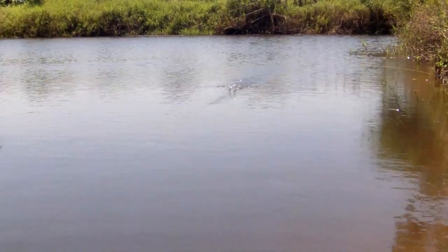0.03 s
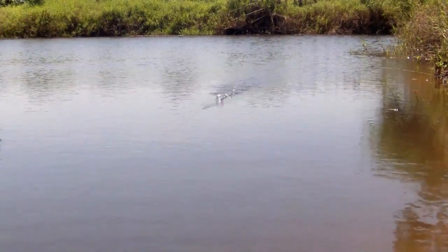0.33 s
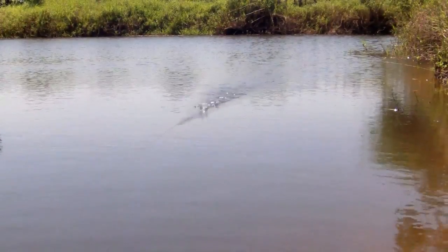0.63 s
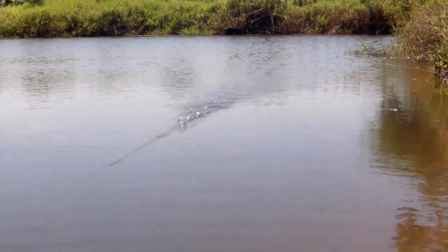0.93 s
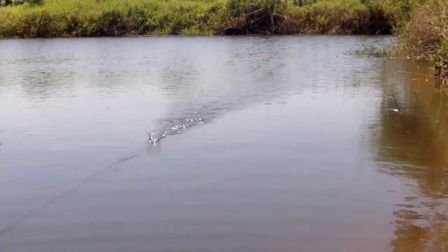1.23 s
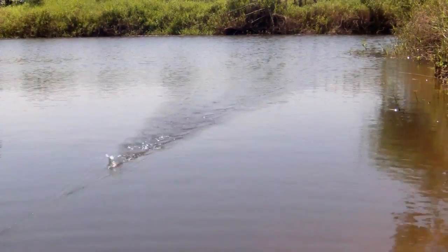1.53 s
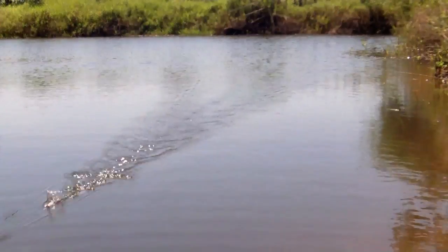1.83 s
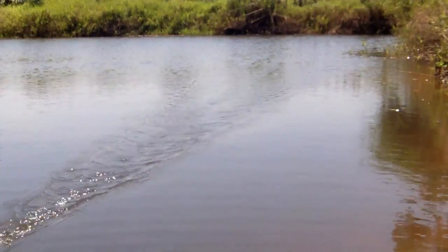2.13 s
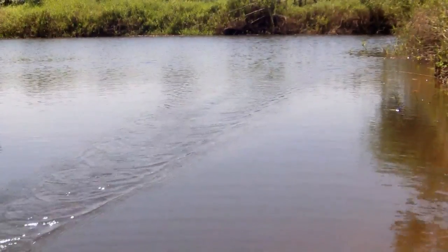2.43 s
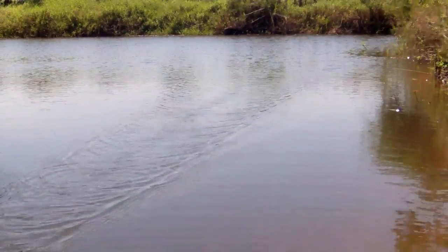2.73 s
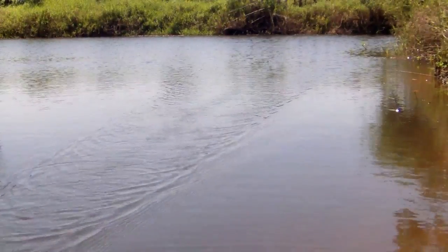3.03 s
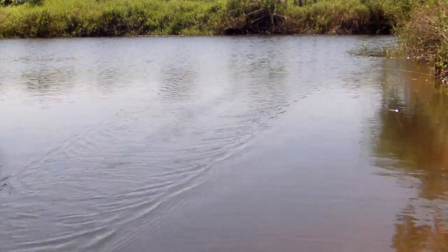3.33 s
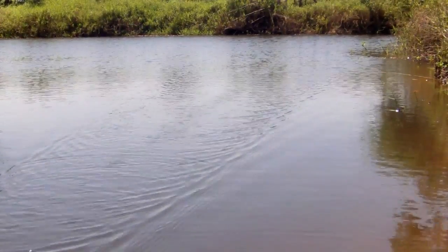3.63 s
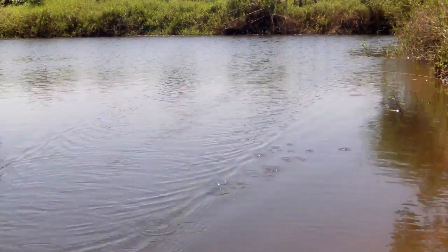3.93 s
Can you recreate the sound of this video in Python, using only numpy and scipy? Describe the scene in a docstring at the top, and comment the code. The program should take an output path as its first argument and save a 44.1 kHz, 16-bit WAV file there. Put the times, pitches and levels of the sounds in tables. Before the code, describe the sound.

Small splashes and gurgles build as a lure is reeled in over a pond, with faint whirring and slowing rasps. The reel stops, then come two soft swishes and a tap, amid insects, low hum and microphone bumps.

```python
"""On a calm pond, a fishing lure skitters closer as it is reeled in fast; a last few drips follow.
Its drops, spray and gurgles sound by the resonance of air bubbles trapped in the water.
The reel whirs, whines and rings faintly, with a run of rasping chirrs that slow down; near the end
come two soft swishes and a sharp tap. A steady low hum, probably of the reel's rotor, lies beneath.
Insects pulse on the bank; a hand-held camera adds rumble and a thin whine."""
import sys
import numpy as np
from scipy import signal
from scipy.fft import rfft, irfft, next_fast_len
from scipy.io import wavfile
from scipy.ndimage import uniform_filter1d, map_coordinates

SR = 44100
rng = np.random.default_rng(int(sys.argv[2]) if len(sys.argv) > 2 else 0)


def master(y):
    """Save y as 16-bit WAV."""
    cut = np.clip(np.atleast_2d(y).T, -1, 1)
    pcm = np.round(cut * 32767)  # scale
    wavfile.write(sys.argv[1], SR, pcm.astype(np.int16))


N = 176400


def drops():
    """Impact and entrainment: each drop makes a tiny splat and traps a bubble that rings."""
    # nearby drops: t/s, relative level/dB, starting bubble f/Hz, T60/s
    impacts = [(0.0247, -17.5, 2100, 0.011), (0.3024, -18, 3740, 0.003), (0.3411, -15, 2280, 0.014),
               (0.4012, -18.5, 3540, 0.011), (0.455, -24, 1740, 0.017), (0.4902, -10, 2420, 0.0033),
               (0.6358, -19, 2270, 0.006), (0.7908, -15, 2180, 0.0071), (1.0062, -6.5, 5590, 0.0039),
               (1.101, -6.5, 5500, 0.0039), (1.338, -10, 5590, 0.0035), (1.3862, -14, 2200, 0.0092),
               (1.4631, -7, 5070, 0.0028), (1.5178, -19, 1660, 0.019), (1.6055, -4.5, 5300, 0.0036),
               (1.632, -15, 6100, 0.005), (1.756, -9.5, 5550, 0.0026), (1.8453, -9, 5840, 0.0049),
               (1.9103, -7.5, 4850, 0.0037), (1.9583, -20.5, 1530, 0.019), (1.979, -20.5, 3280, 0.013),
               (2.0038, -10.5, 2440, 0.0085), (2.0724, -2, 5060, 0.0043), (2.0934, -21, 2080, 0.018),
               (2.1316, -3.5, 6510, 0.0037), (2.151, -11, 3160, 0.006), (2.1602, -18, 2420, 0.012),
               (2.1686, -16, 2430, 0.017), (2.2135, -6, 5030, 0.0022), (2.2229, -10, 4800, 0.003),
               (2.3014, -8.5, 1820, 0.0065), (2.3374, -14.5, 2000, 0.0066), (2.3702, -8.5, 4450, 0.003),
               (2.3819, 0, 4240, 0.0024), (2.4404, -28, 1650, 0.023), (2.4458, -2.5, 2020, 0.006),
               (2.5022, -5, 5430, 0.0034), (2.5439, -16, 5590, 0.006), (2.5624, -7, 6940, 0.005),
               (2.5928, -0.5, 3460, 0.001), (2.6008, -14.5, 2160, 0.014), (2.6504, -11.5, 6040, 0.0094),
               (2.672, -18, 2100, 0.024), (2.6794, -26, 4800, 0.006), (2.6873, -11, 6040, 0.003),
               (2.7012, -7.5, 5930, 0.0082), (2.713, -9, 7030, 0.0036), (2.7213, -28, 1370, 0.011),
               (2.7444, -9, 1700, 0.0065), (2.8111, -5.5, 5670, 0.009), (2.8251, -11, 6760, 0.005),
               (2.8597, -13, 5300, 0.013), (2.8678, -4, 4220, 0.0069), (2.9216, 0, 2420, 0.005),
               (2.9594, -9, 4600, 0.0039), (3.185, -10, 6600, 0.0079), (3.2545, -5.5, 3920, 0.0029),
               (3.359, -15.5, 3300, 0.0042)]
    # impact noise spectrum: f/Hz, relative density/dB
    splat_band = [(600, -27), (1800, -4.5), (3500, 1.5), (7000, 0.5), (10000, -5.5), (14000, -2)]
    rise_s, fall_s = 0.00095, 0.0023
    t = np.arange(-(SR // 100), SR // 100) / SR
    splat = np.exp(np.minimum(t / rise_s, -t / fall_s))
    rings, splats = np.zeros(N), np.zeros(N)
    for s, db, hz, t60 in impacts:
        add(rings, s, amp(db + 0.5) * bubble(hz, t60))
        add(splats, s + t[0], amp(db - 12.5) * splat)
    return rings + splats * noise(splat_band)


def bubble(hz, t60, rise=0.17, attack_s=0.00012):
    """Minnaert resonance: trapped air rings as a damped tone, gliding up by the fraction rise per T60."""
    t = np.arange(int(1.2 * t60 * SR) + 2) / SR
    phase = 2 * np.pi * hz * t * (1 + rise * t / t60 / 2)
    return np.sin(phase) * decay(t, t60) * (1 - np.exp(-t / attack_s))


def bubbles(start, length, count, hz, spread, cycles, scatter_db):
    """Incoherent sum of bubbles with log-normal pitches and a T60 in cycles; rms about 1 over length."""
    cloud = np.zeros(N)
    for when, pitch, size in zip(rng.random(count), *rng.standard_normal((2, count))):
        f = np.clip(hz * np.exp(spread * pitch), 500, 12000)
        gain = amp(scatter_db * np.clip(size, -2, 2))
        add(cloud, start + when * length, gain * bubble(f, cycles / f))
    return unit(cloud) * np.sqrt(length * SR / N)


def wake():
    """Bubble clouds behind the lure: small bubbles ring high as spray, large ones lap and gurgle."""
    # spray, growing as the lure nears: t/s, level/dB
    spray_levels = [(0, -41.5), (.8, -41.5), (1.9, -39.5), (2.7, -37.5), (2.87, -45), (3.0, -78), (4, -43)]
    # big bubbles where the lure digs in: t/s, duration/s, level/dB, f/Hz
    digs = [(1.06, .05, -38, 1400), (1.21, .05, -34, 1650), (1.56, .05, -33, 2250), (1.65, .04, -35, 1250),
            (2.11, .04, -38, 1300), (2.27, .05, -36, 1250), (2.39, .06, -36, 1400), (2.54, .03, -35, 1850),
            (2.68, .07, -31, 1200)]
    # spatter falling back: t/s, duration/s, level/dB
    showers = [(2.343, 0.041, -35.5), (2.54, 0.021, -33), (2.656, .065, -33)]
    spray_db, = curves(spray_levels)
    spray = bubbles(0, N / SR, count=1100, hz=4440, spread=0.362, cycles=31, scatter_db=4)
    lapping = bubbles(0, N / SR, count=480, hz=1792, spread=0.33, cycles=72, scatter_db=4)
    gurgles = sum(amp(db) * bubbles(s, length, count=8, hz=hz, spread=0.191, cycles=35, scatter_db=1.5)
                  for s, length, db, hz in digs)
    spatter = sum(amp(db) * bubbles(s, length, count=18, hz=6050, spread=0.16, cycles=20, scatter_db=2)
                  for s, length, db in showers)
    return amp(spray_db) * (spray + amp(-5) * lapping) + gurgles + spatter


def reel():
    """Forced vibration: whir, ringing and a gear whine frequency-modulated by each turn of the handle."""
    # reel resonances: f/Hz, half-width/Hz, relative level/dB
    modes = [(2750, 16, -1), (2820, 40, 3), (6500, 87, -1)]
    # whir spectrum: f/Hz, relative density/dB
    whir_band = [(500, -31), (1500, 6), (2700, 12), (4500, 8), (6500, 9.5), (8000, -1.5), (13000, -22)]
    # gear tones at mean speed: f/Hz, rms level/dB
    gear_lines = [(4650, -51), (5620, -47.5)]
    turn_s, fastest_at_s, surge = 0.385, 0.31, 0.055
    stop_s, fade_s = 2.88, 0.27
    running = np.clip((stop_s - clock()) / fade_s + 0.5, 0, 1)
    speed = 1 + surge * np.cos(2 * np.pi * (clock() - fastest_at_s) / turn_s)
    ring = unit(sum(amp(db + 4.1 * wobble(11)) * resonance(hz, width) for hz, width, db in modes))
    whine = np.zeros(N)
    for hz, db in gear_lines:
        gain = np.sqrt(2) * amp(db + 3.5 * wobble(30.04))
        jitter = 0.014 * (wobble(600) + wobble(10))
        whine += gain * glide(hz * (speed + jitter))
    whir = amp(-38 + 0.98 * wobble(25.03)) * noise(whir_band)
    return running * (amp(-47) * ring + whine + whir)


def chirrs():
    """Puffs of noise in fixed resonances; fast amplitude modulation makes them rasp."""
    # chirrs: centre t/s, full duration/s, relative level/dB
    puffs = [(0.747, 0.032, -33.5), (0.808, 0.03, -43), (0.88, 0.03, -30.5), (0.93, 0.033, -31),
             (0.985, 0.042, -33), (1.04, 0.051, -30.5), (1.094, 0.066, -29.5), (1.159, 0.056, -29.5),
             (1.22, 0.055, -24.5), (1.282, 0.05, -25.5), (1.35, 0.046, -24), (1.413, 0.055, -25.5),
             (1.485, 0.089, -27.5), (1.569, 0.1, -25), (1.669, 0.081, -25), (1.778, 0.082, -27.5)]
    # their resonances: f/Hz, half-width/Hz, relative level/dB
    modes = [(2800, 330, -3), (3095, 63, -3), (3244, 38, -1), (3365, 66, -11), (3678, 90, 0.5),
             (4220, 90, -9)]
    ring = sum(amp(db) * resonance(hz, width) for hz, width, db in modes)
    rasp = unit(ring * amp(2 * wobble(400)))
    return rasp * sum(amp(db + 1) * swell(s, length / 2) for s, length, db in puffs)


def squeal():
    """One short gliding tone among the chirrs, with slight random frequency modulation."""
    # course of the squeal: t/s, f/Hz, peak level/dB
    course = [(1.585, 2320, -45), (1.597, 2510, -21), (1.604, 2440, -21), (1.610, 2950, -13),
              (1.619, 2740, -12.5), (1.627, 2733, -28.5), (1.648, 2800, -26), (1.66, 2800, -60)]
    hz, db = curves(course)
    sounding = (clock() > course[0][0]) & (clock() < course[-1][0])
    return amp(db) * glide(hz * (1 + 0.016 * wobble(500))) * sounding


def tap():
    """Impulse response of a small hard object: two quick blows, each a dry crack and decaying modes."""
    # blows: t/s, relative level/dB, spectral tilt/(dB per octave)
    blows = [(3.7419, -10, -2), (3.7442, -2.5, 1.5)]
    # modes of the object: f/Hz, relative level/dB, T60/s
    modes = [(716, -24, 0.017), (1150, -13, .014), (2220, -8, 0.021), (2630, -10.5, .016),
             (4240, -7.5, 0.01), (6530, -7.5, 0.013), (6800, -7, 0.0084), (9100, -12, 0.01)]
    # crack spectrum: f/Hz, relative density/dB
    crack_band = [(300, -6), (900, 1), (5000, -1), (9000, -4), (15000, -16)]
    crack_db, crack_s = -7.5, 0.0015
    t = np.arange(SR // 20) / SR
    rings, cracks = np.zeros(N), np.zeros(N)
    for s, db, tilt in blows:
        for hz, mode_db, t60 in modes:
            gain = amp(db + mode_db + tilt * np.log2(hz / 4000))
            add(rings, s, gain * decay(t, t60) * np.sin(2 * np.pi * (hz * t + rng.random())))
        add(cracks, s, amp(db + crack_db) * np.exp(-t / crack_s))
    return rings + cracks * noise(crack_band)


def swishes():
    """Friction noise: soft rushes in bands reaching about an octave either side of their centres."""
    # two overlapping rushes per swish: centre t/s, half-height width/s, level/dB, centre f/Hz
    rushes = [(3.452, 0.12, -36, 2870), (3.52, 0.15, -36, 4850), (3.919, .06, -28, 4800),
              (3.974, 0.09, -28.5, 4420)]
    out = np.zeros(N)
    for s, length, db, hz in rushes:
        band = filtered(rng.standard_normal(N), lambda f: (1 + np.log2((f + 1) / hz) ** 2) ** -1.23)
        out += amp(db) * swell(s, length) * unit(band)
    return out


def bank_echo(sound, t60=0.075):
    """Diffuse reflection from the bank: convolution with a short decaying noise of unit energy."""
    t = np.arange(SR // 4) / SR
    tail = rng.standard_normal(len(t)) * decay(t, t60)
    return signal.fftconvolve(sound, tail / np.linalg.norm(tail))[:N]


def hum():
    """Periodic vibration: a steady low hum, probably of the reel's rotor."""
    return tone(hz=75.5, db=-24.5)


def insects():
    """Incoherent sources add in power: a steady high chorus plus about eight pulses a second."""
    # pulse centres: t/s
    pulse_times = [.05, .2, .33, .46, .59, .71, .82, .98, 1.08, 1.21, 1.31, 1.47, 1.6, 1.73, 1.85, 1.98,
                   2.11, 2.27, 2.43, 2.56, 2.67, 2.81, 2.92, 3.08, 3.19, 3.38, 3.48, 3.62, 3.71, 3.92]
    # chorus spectrum: f/Hz, relative density/dB
    chorus_band = [(6500, -50), (8300, -3), (9700, 0), (10900, -3.5), (11700, -11.5), (13000, -35)]
    bed_db, pulse_db, scatter_db = -44, -35, 1.8
    pulses = sum(swell(s, 0.068) for s in pulse_times)
    spectra = signal.stft(noise(chorus_band), nperseg=512)[2]
    # random patches of gain in frequency and time make pitches come and go
    patches = uniform_filter1d(rng.standard_normal(spectra.shape), size=5, axis=0)
    patches = unit(uniform_filter1d(patches, size=8, axis=1))
    chorus = unit(signal.istft(spectra * amp(scatter_db * patches), nperseg=512)[1][:N])
    power = amp(bed_db) ** 2 + amp(pulse_db + wobble(5.7)) ** 2 * pulses ** 1.12
    return chorus * np.sqrt(power)


def camera():
    """Structure-borne sound: low bumps on the microphone, and the camera's thin whine."""
    # bumps: centre t/s, half-height width/s, rms level/dB, f/Hz
    bumps = [(0.873, 0.049, -14.5, 45), (1.256, 0.069, -12.5, 60), (1.59, .035, -10.5, 55),
             (1.664, 0.097, -13.5, 37), (2.133, 0.037, -10, 44.8), (2.371, 0.044, -13, 40.1),
             (2.433, 0.03, -8, 87.8)]
    # faint tones: f/Hz, rms level/dB
    faint_tones = [(397, -49), (11832, -56), (11892, -58), (15676, -50), (15735, -44)]
    rumble = sum(amp(db) * swell(s, length) * np.sin(2 * np.pi * hz * clock() + 1.2 * wobble(60))
                 for s, length, db, hz in bumps)
    return np.sqrt(2) * rumble + sum(tone(hz, db) for hz, db in faint_tones)


def air():
    """Stationary ambient noise, strongest in the deep bass."""
    # air spectrum: f/Hz, relative density/dB
    air_band = [(15, -5.5), (32, 0.5), (60, -4.5), (100, -10), (160, -16), (260, -21.5), (800, -31.5),
                (2000, -38), (9000, -41.5), (13000, -47)]
    return amp(-22.5) * noise(air_band)


def amp(db):
    """Decibels to amplitude ratio."""
    return 10 ** (np.asarray(db) / 20)


def unit(x):
    """Normalisation to rms 1."""
    return x / np.sqrt(np.mean(x ** 2) + 1e-20)


def clock():
    """t/s of every sample."""
    return np.arange(N) / SR


def curves(rows):
    """Linear interpolation in time of each column after the first."""
    s, *columns = np.transpose(rows)
    return [np.interp(clock(), s, column) for column in columns]


def wobble(rate):
    """Smooth random modulation, rate knots a second."""
    return map_coordinates(rng.standard_normal(int(N * rate / SR) + 4), [np.arange(N) * rate / SR])


def decay(t, t60):
    """Exponential damping, 60 dB in t60."""
    return np.exp(-np.log(1000) * t / t60)


def tone(hz, db):
    """A sine of rms level db with slight amplitude and phase modulation."""
    return np.sqrt(2) * amp(db + wobble(5.66)) * np.sin(2 * np.pi * hz * clock() + 0.25 * wobble(7))


def glide(hz):
    """A sine whose phase is the integral of its frequency."""
    return np.sin(2 * np.pi * np.cumsum(hz) / SR)


def filtered(x, response):
    """Linear filtering: the spectrum of x times a frequency response."""
    size = next_fast_len(N + SR // 2)
    return irfft(rfft(x, size) * response(np.fft.rfftfreq(size, 1 / SR)), size)[:N]


def noise(points):
    """Noise of rms 1 with a spectrum through (f/Hz, density/dB) points."""
    f, db = np.transpose(points)
    white = rng.standard_normal(N)
    return unit(filtered(white, lambda hz: amp(np.interp(np.log(hz + 1), np.log(f), db))))


def resonance(hz, width):
    """A noise-driven resonance of rms 1, at half amplitude width Hz either side."""
    return unit(filtered(rng.standard_normal(N), lambda f: 1 / (1 + ((f - hz) / width) ** 2)))


def swell(middle, length):
    """A raised-cosine envelope, length wide at half height."""
    return np.cos(np.pi / 2 * np.clip((clock() - middle) / length, -1, 1)) ** 2


def add(track, s, sound):
    """Superpose a sound on the track at time s."""
    i = int(np.clip(round(s * SR), 0, N))
    track[i:i + len(sound)] += sound[:N - i]


def scene():
    """Superposition of all sources; the splashes, chirrs, squeal and tap reflect weakly off the bank."""
    water_top_hz = 10500  # the splashes are dull above this
    water = filtered(drops() + wake(), lambda hz: 1 / np.sqrt(1 + (hz / water_top_hz) ** 8))
    near = water + chirrs() + squeal() + tap()
    echo = amp(-10.5) * bank_echo(near)
    return (near + echo + reel() + swishes() + insects() + camera() + hum() + air())[None]


def record(dry):
    """Microphone response: a dip in the treble, clipping at full scale and a band limit."""
    dip_hz, width_hz, dip_db, top_hz = 7990, 410, -10.5, 15850
    coloured = filtered(dry[0], lambda hz: amp(dip_db * np.exp(-((hz - dip_hz) / width_hz) ** 2)))
    return filtered(np.clip(coloured, -1, 1), lambda hz: hz < top_hz)[None]


dry = scene()
out = record(dry)
master(out)
```